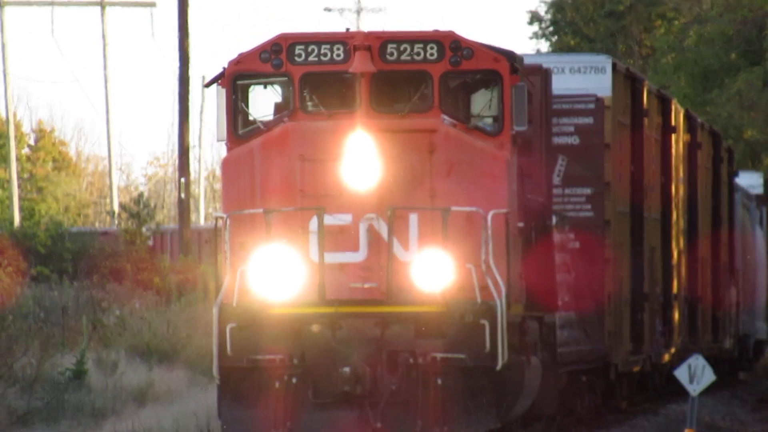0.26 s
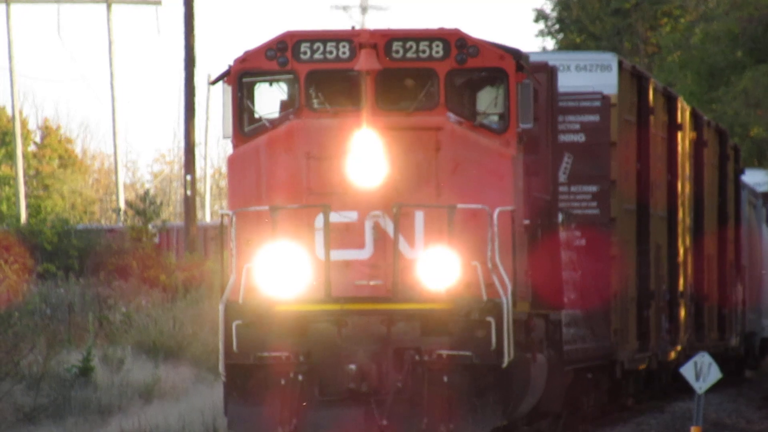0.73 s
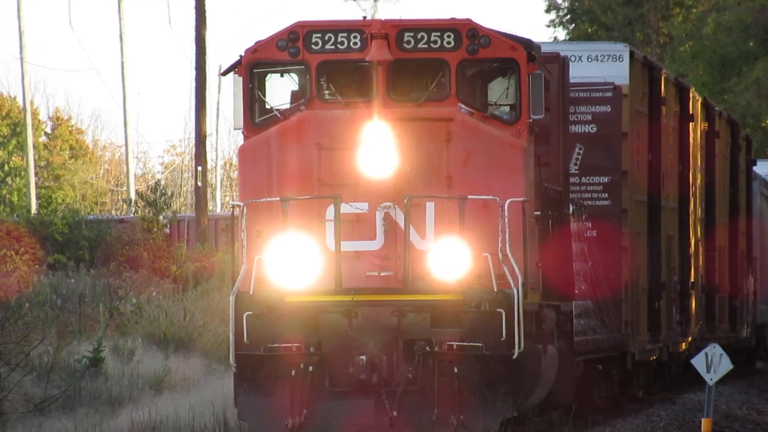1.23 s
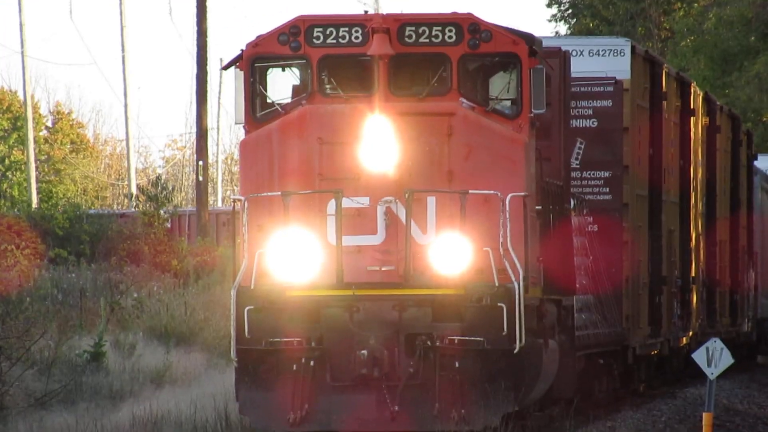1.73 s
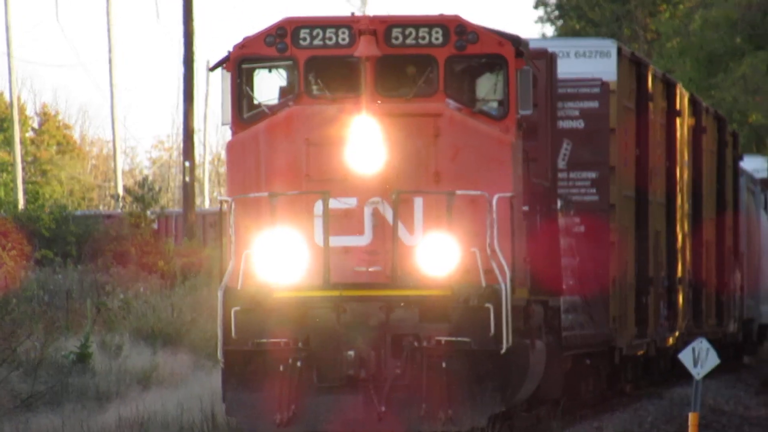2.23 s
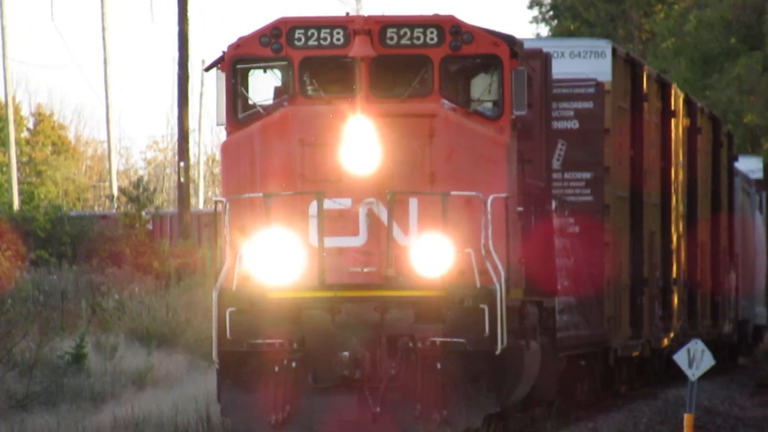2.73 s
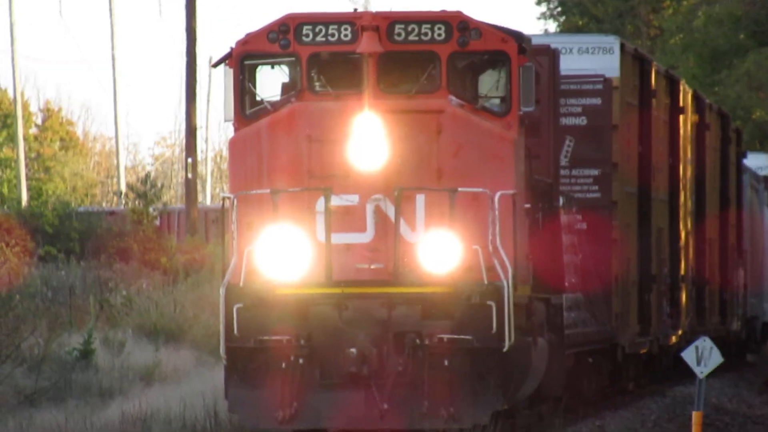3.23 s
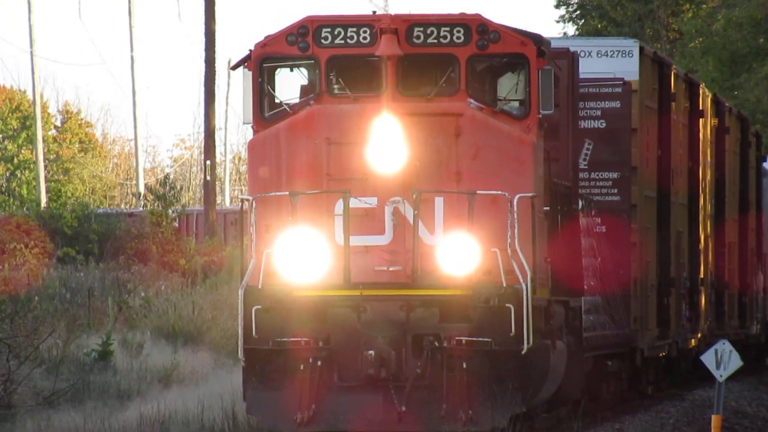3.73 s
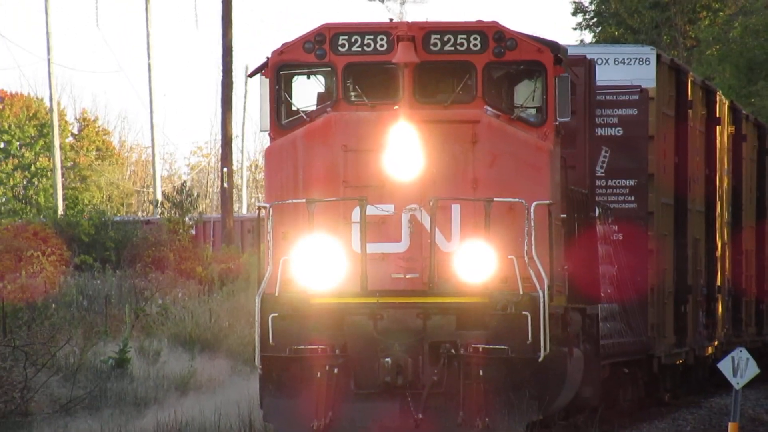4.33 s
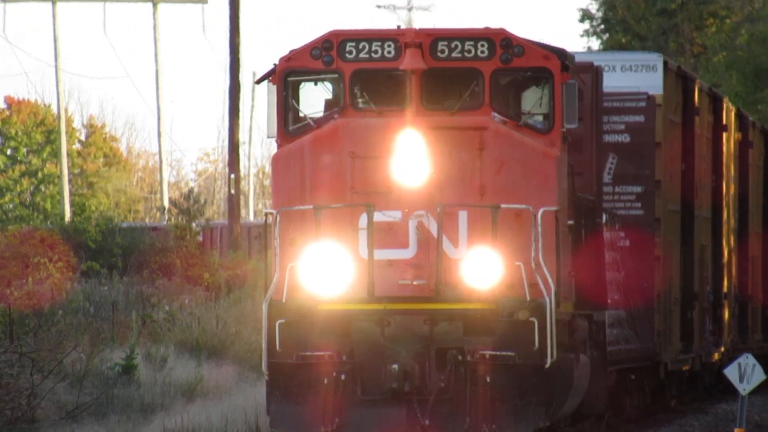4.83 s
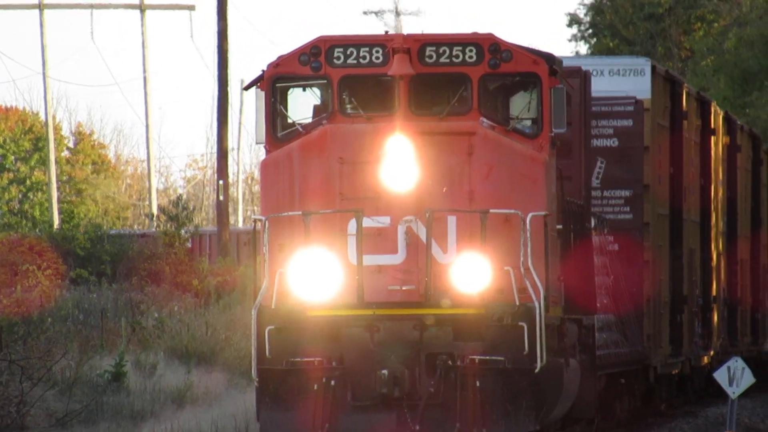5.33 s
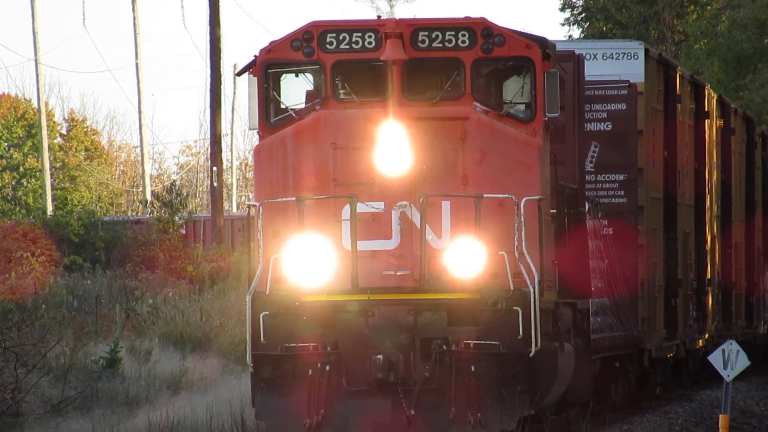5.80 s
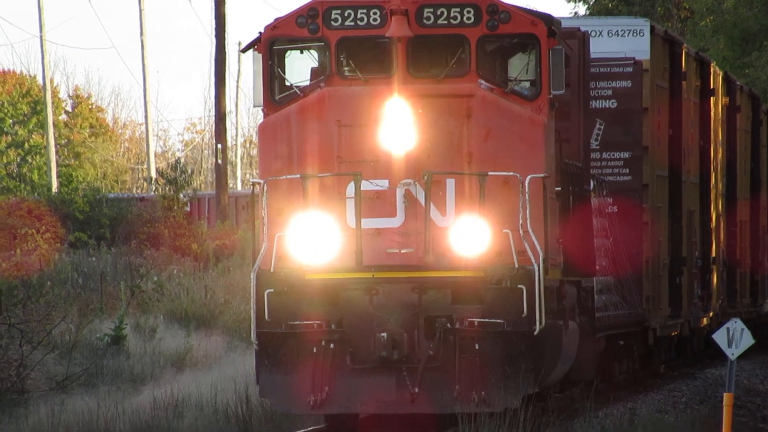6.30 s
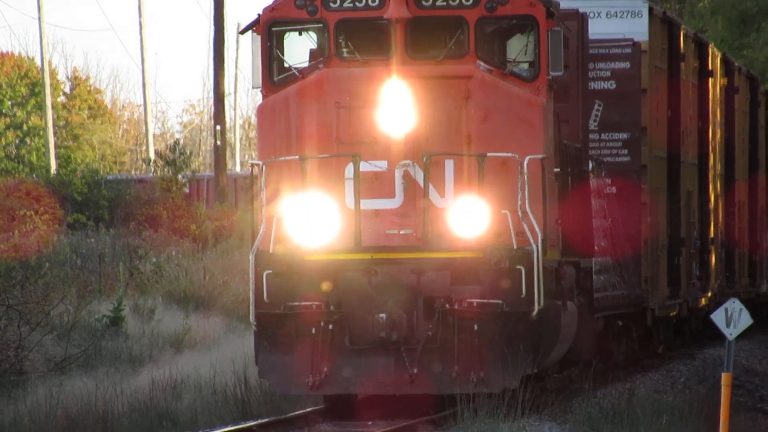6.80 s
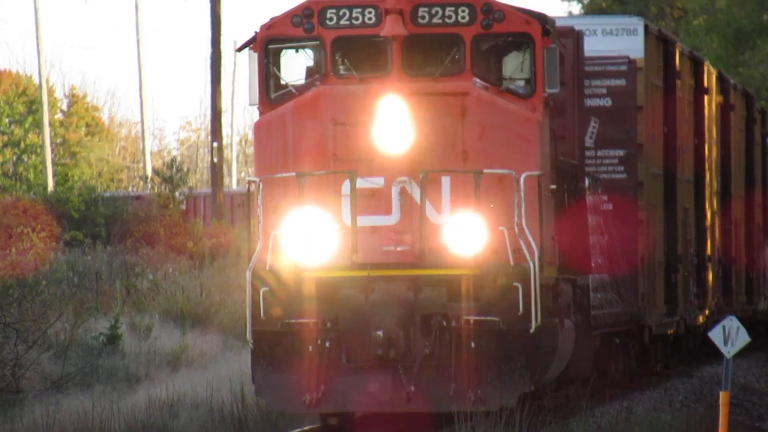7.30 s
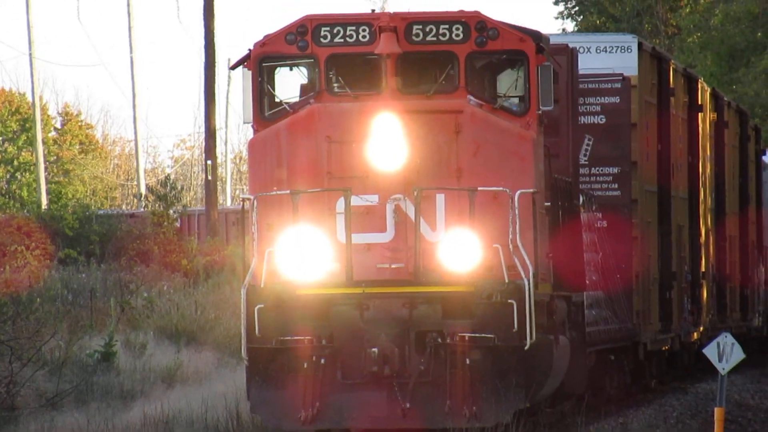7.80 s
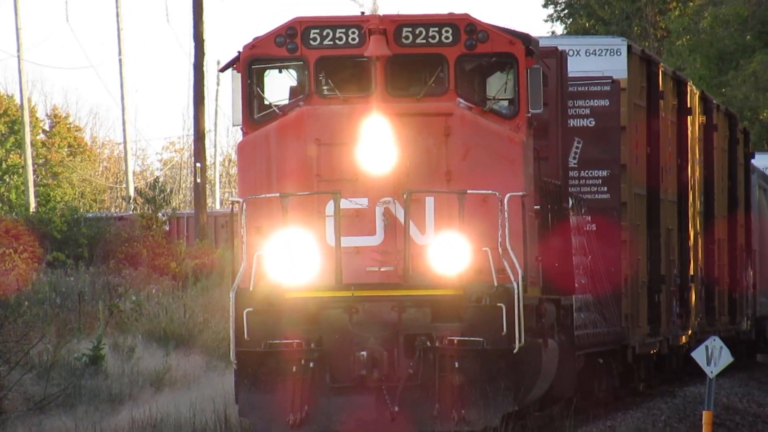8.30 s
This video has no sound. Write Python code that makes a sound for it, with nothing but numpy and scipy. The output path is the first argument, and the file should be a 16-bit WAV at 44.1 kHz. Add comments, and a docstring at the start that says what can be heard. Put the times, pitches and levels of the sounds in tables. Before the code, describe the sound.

A large diesel locomotive idles outdoors with a deep uneven throb, humming gears, fan roar and a faint warbling whine, plus one short air hiss.

```python
"""Open track: a sixteen-cylinder two-stroke diesel locomotive stands idling.
Uneven exhaust pulses excite silencer and stack resonances over a steady low drone; gear mesh tones hum
and a warbling turbocharger tone whines. Shaped noise and ringing panels, doors and grilles give fan roar,
valve clatter and rushing air; two bursts of band noise make the air dryer spit once."""
import sys
import numpy as np
from scipy import signal
from scipy.fft import rfft, irfft, next_fast_len
from scipy.io import wavfile

SR = 44100
rng = np.random.default_rng(int(sys.argv[2]) if len(sys.argv) > 2 else 0)


def unload_audio(sound):
    """Save the sound as a 16-bit wav file, at the path given as the first command line argument."""
    columns = np.transpose(np.atleast_2d(sound))
    # keep every value between -1 and 1, then stretch to whole-number steps
    steps = np.round(np.clip(columns, -1, 1) * 32767)
    wavfile.write(sys.argv[1], SR, steps.astype(np.int16))


N = 377055
TIME = np.arange(N) / SR   # s

REVS_PER_S = 5.1156
GEAR_TEETH = 79
TURBO_HZ = 4337   # mean
SPIT_AT_S = 2.153
CUTOFF_HZ = 14900

# Broad noise spectra, before the gains over time. Each row: frequency in Hz, level in dB per Hz.
FAN_SPECTRUM = [(15, -87), (45, -78), (80, -61), (110, -70), (200, -70.5), (330, -74.5), (470, -74),
                (540, -75.5), (720, -71.5), (950, -73), (1200, -84), (2000, -93.5), (4000, -108)]
CLATTER_SPECTRUM = [(600, -97), (1000, -77), (1300, -76), (1550, -74), (1900, -78), (2300, -86.5),
                    (2800, -87), (3600, -95.5), (4200, -99), (5000, -106), (9000, -120)]
AIR_SPECTRUM = [(1200, -103), (1850, -87.5), (2250, -77), (2700, -87.5), (3600, -93.5), (5000, -98.5),
                (6800, -97.5), (10000, -102.3), (12500, -106.5), (15000, -112)]

# Noise-fed resonances, before the gains over time: hood panels, hood doors, air grilles.
# Each row: frequency in Hz, width of one resonator pass in Hz, rms level in dB.
PANELS = [(29.4, 6.4, -57), (281.4, 45, -52), (472, 34, -62.5), (783, 107, -54)]
DOORS = [(1476, 24, -59), (1570, 180, -60.5), (1900, 8.7, -69)]
GRILLES = [(2153, 82, -64), (2433, 18, -62.5), (2950, 19, -75)]

# Fan and clatter swells locked to the crank; zero depth mutes a row.
# Each row: swells per turn, time of first top in seconds, depth in dB.
ROAR_SWELLS = [(1, 0.16, 0), (2, 0.035, 0.52), (8, 0.018, .5)]

# Air dryer: bright jet, then duller blow.
# Each row: delay in seconds, rise in seconds, hold from onset in seconds, 60 dB decay time in seconds,
# frequency in Hz, width of one resonator pass in Hz, rms level in dB before the envelope.
SPIT = [(0, 0.02, 0.027, 0.35, 5940, 3600, -52), (.008, 0.027, 0.051, 0.5, 2780, 1880, -45.5)]

# Brief rises of the whine. Each row: time of top in seconds, half-width to 1/e in seconds, gain in dB.
FLARES = [(.61, 0.055, 5), (.82, .04, 7.5), (1.36, .045, 6.5), (3.12, .035, 5), (4.85, 0.49, 3),
          (6.45, .04, 4)]

# Timing gear mesh, one row per harmonic from the first.
# Each row: steady tone rms in dB, scattered tone rms in dB, scatter width in Hz.
GEAR_MESH = [(-51, -64, 13), (-52, -55.5, 32), (-60, -65, 23)]

# Exhaust pulse of each cylinder. Each row: crank angle at the stack in degrees, mean strength in dB.
CYLINDERS = [(14.9, 0.7), (42.9, -1.8), (63.0, -0.5), (87.5, -2.8), (95.5, 2.0), (110.5, 1.3), (143.0, 0.2),
             (159.6, -3.3), (188.0, -1.1), (209.4, -0.9), (230.7, 2.1), (254.8, 2.1), (280.0, -1.6),
             (294.9, -1.1), (330.0, 2.5), (340.1, 1.6)]

# Silencer and stack resonances. Each row: frequency in Hz, width of one resonator pass in Hz, gain in dB.
STACK = [(41.1, 7.5, 19.5), (79.85, 19.5, 28), (117.3, 23, 5.5), (165.3, 22.4, 7), (258.2, 60, 7)]

FAN_START_DB, FAN_GROWTH_DB_PER_S = -1.38, 0.2555
CLATTER_START_DB, CLATTER_SETTLED_DB = 0.98, -0.5
SETTLE_AT_S, SETTLE_S = 3.5, 0.26
CLATTER_FOLLOWS = 0.34   # share of the roar swells, in dB
AIR_START_DB, AIR_BUILDS_AT_S, AIR_GROWTH_DB_PER_S = -2.5, 5.9, 1.93
WHINE_START_DB, WHINE_FADE_DB_PER_S = -61, 0.16
WAVER_DB, WAVER_HZ = 0.6, 5.1
UNEVEN_DB, JITTER_S = 0.3, 0.00008   # random spread of each firing


def from_db(db):
    """Decibels to gain."""
    return 10 ** (np.asarray(db) / 20)


def rms_one(x):
    """Scale to unit rms."""
    return x / np.sqrt(np.mean(np.abs(x) ** 2) + 1e-20)


def resonate(x, hz, width_hz):
    """Two passes of one resonance for steep skirts; peak gain 1."""
    r = np.exp(-np.pi * width_hz / SR)
    b = (1 - r * r) / 2 * np.array([1, 0, -1])
    a = [1, -2 * r * np.cos(2 * np.pi * hz / SR), r * r]
    once = signal.lfilter(b, a, x + 1e-18)
    return signal.lfilter(b, a, once)


def drift(rate_hz):
    """Slow random signal of unit rms: noise through two equal low-pass poles, run in for a second."""
    r = np.exp(-2 * np.pi * rate_hz / SR)
    slow = signal.lfilter([1], [1, -2 * r, r * r], rng.standard_normal(N + SR))
    return rms_one(slow[SR:])


def coloured_noise(spectrum):
    """Noise shaped to a level per Hz, falling away below the first point."""
    hz, level_db = np.transpose(spectrum)
    size = next_fast_len(N)
    f = np.maximum(np.arange(size // 2 + 1) * SR / size, 1)
    gain = from_db(np.interp(np.log(f), np.log(hz), level_db))
    gain = gain * np.minimum(f / hz[0], 1) ** 2
    white = rfft(rng.standard_normal(size))
    return irfft(white * gain * np.sqrt(SR / 2), size)[:N]


def ringing(modes):
    """Separate noise held in each resonance of a set."""
    out = 0
    for hz, width_hz, level_db in modes:
        ring = resonate(rng.standard_normal(N + SR), hz, width_hz)[SR:]
        out = out + from_db(level_db) * rms_one(ring)
    return out


def scattered(cycles, width_hz):
    """Tone by many changing paths: level and phase wander; unit rms."""
    in_phase = drift(width_hz / 2) * np.cos(2 * np.pi * cycles)
    quadrature = drift(width_hz / 2) * np.sin(2 * np.pi * cycles)
    return rms_one(in_phase + quadrature)


def crank(surge, kick, fastest_at_turn):
    """Revolutions turned: speed surges once a turn and ripples at the mean firing rate."""
    # fastest_at_turn: crank position of the fastest moment, in turns
    angle = 2 * np.pi * (REVS_PER_S * TIME - fastest_at_turn)
    speed = REVS_PER_S * (1 + surge * np.cos(angle) + kick * np.cos(len(CYLINDERS) * angle))
    return np.cumsum(speed) / SR


def crank_swell(per_turn, top_s):
    """Swing between -1 and 1, locked to the mean crank speed."""
    return np.cos(2 * np.pi * round(per_turn) * REVS_PER_S * (TIME - top_s))


def rushing_air():
    """Flow noise, steady and then building; the grilles sing out faster than the flow noise grows."""
    air_db = AIR_START_DB + AIR_GROWTH_DB_PER_S * np.maximum(TIME - AIR_BUILDS_AT_S, 0)
    flow = from_db(air_db)
    return flow * (coloured_noise(AIR_SPECTRUM) + flow * ringing(GRILLES))


def roar_throb_db():
    """Sum of the crank-locked swells, in dB."""
    return sum(db * crank_swell(per_turn, top_s) for per_turn, top_s, db in ROAR_SWELLS)


def valve_clatter(throb_db, flutter_db):
    """Clatter noise and ringing hood doors, settling once to a softer level."""
    settled = (1 + np.tanh((TIME - SETTLE_AT_S) / SETTLE_S)) / 2
    level_db = CLATTER_START_DB * (1 - settled) + CLATTER_SETTLED_DB * settled
    level_db = level_db + CLATTER_FOLLOWS * throb_db + flutter_db * drift(30)
    return from_db(level_db) * (coloured_noise(CLATTER_SPECTRUM) + ringing(DOORS))


def fan_roar(throb_db, flutter_db):
    """Fan noise and ringing hood panels, growing evenly in dB and swelling with the crank."""
    level_db = FAN_START_DB + FAN_GROWTH_DB_PER_S * TIME + throb_db + flutter_db * drift(16)
    return from_db(level_db) * (coloured_noise(FAN_SPECTRUM) + ringing(PANELS))


def air_dryer():
    """The drain valve opens and blows briefly; the hiss decays, its top cut at 9.8 kHz."""
    out = 0
    for delay_s, rise_s, hold_s, t60_s, hz, width_hz, level_db in SPIT:
        age_s = TIME - SPIT_AT_S - delay_s
        opening = np.sqrt(np.clip(age_s / rise_s, 0, 1))
        fading = np.exp(-np.log(1000) * np.maximum(age_s - hold_s, 0) / t60_s)
        out = out + opening * fading * ringing([(hz, width_hz, level_db)])
    return signal.sosfilt(signal.butter(6, 9800, fs=SR, output="sos"), out)


def turbocharger(scatter_db, throb_db, beat_db):
    """Geared to the crank at idle: the whine warbles and swells with each turn, fades slowly and flares."""
    cycles = TURBO_HZ / REVS_PER_S * crank(surge=0.0056, kick=0.0096, fastest_at_turn=0.148)
    steady = np.sqrt(2) * np.sin(2 * np.pi * cycles)
    whine = steady + from_db(scatter_db) * scattered(cycles, width_hz=136)
    swell_db = throb_db * crank_swell(1, top_s=0.014)
    swell_db = swell_db + beat_db * crank_swell(len(CYLINDERS) / 2, top_s=0.006)
    flare_db = sum(db * np.exp(-((TIME - top_s) / width_s) ** 2) for top_s, width_s, db in FLARES)
    level_db = WHINE_START_DB - WHINE_FADE_DB_PER_S * TIME + WAVER_DB * drift(WAVER_HZ)
    return from_db(level_db + swell_db + flare_db) * rms_one(whine)


def gears(load_db):
    """Teeth mesh in step with the crank; twisting load lifts upper harmonics and lowers the first."""
    mesh = GEAR_TEETH * crank(surge=0.0027, kick=0.0072, fastest_at_turn=0.18)
    angle = 2 * np.pi * REVS_PER_S * TIME
    load = np.sin(2 * angle - np.pi / 3) + np.cos(5 * angle)
    out = 0
    for k, (steady_db, scatter_db, width_hz) in enumerate(GEAR_MESH, 1):
        brightness = from_db(load_db * (k - 1.5) * load)
        tone = rms_one(brightness * np.sin(2 * np.pi * k * mesh))
        out = out + from_db(steady_db) * tone
        out = out + from_db(scatter_db) * scattered(k * mesh, width_hz)
    return out


def exhaust(drone_db, drone_lag_deg):
    """Cylinder pulses boom in the stack; banks of eight add a steady drone an octave below firing rate."""
    angle_deg, level_db = np.transpose(CYLINDERS)
    turns = np.arange(-2, N / SR * REVS_PER_S)[:, None]
    chance = rng.standard_normal((len(turns), len(angle_deg), 2))
    when_s = (turns + angle_deg / 360) / REVS_PER_S + JITTER_S * chance[..., 0]
    strength = from_db(level_db + UNEVEN_DB * chance[..., 1])
    pulses = np.zeros(N + 2 * SR)   # spare second at each end: already running
    np.add.at(pulses, ((when_s + 1) * SR).astype(int), strength)
    boom = sum(from_db(db) * resonate(pulses, hz, width_hz) for hz, width_hz, db in STACK)
    shaft = 2 * np.pi * REVS_PER_S * TIME - np.radians(drone_lag_deg)
    drone = np.sqrt(2) * np.cos(len(CYLINDERS) / 2 * shaft)
    return boom[SR:SR + N] + from_db(drone_db) * drone


def scene():
    """The standing locomotive, in one channel."""
    throb_db = roar_throb_db()
    hood = rushing_air() + valve_clatter(throb_db, flutter_db=0.47) + fan_roar(throb_db, flutter_db=0.47)
    whine = turbocharger(scatter_db=0.0, throb_db=1.0, beat_db=0.5)
    engine = gears(load_db=3.0) + exhaust(drone_db=-35.5, drone_lag_deg=36.8)
    return (hood + air_dryer() + whine + engine)[None]


def record(dry):
    """Steep elliptic low-pass."""
    return signal.sosfilt(signal.ellip(12, 0.1, 80, CUTOFF_HZ, fs=SR, output="sos"), dry)


dry = scene()
out = record(dry)
unload_audio(out)
```